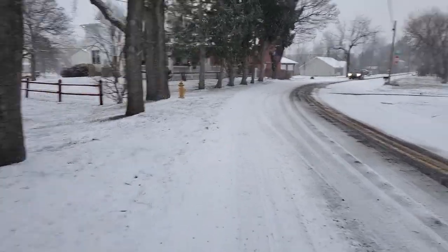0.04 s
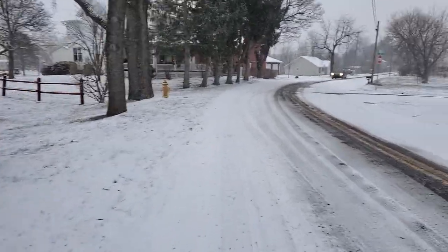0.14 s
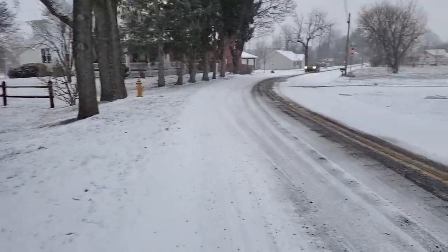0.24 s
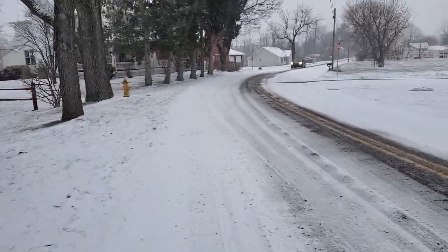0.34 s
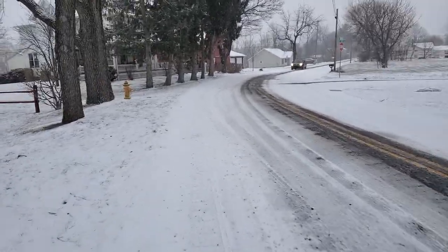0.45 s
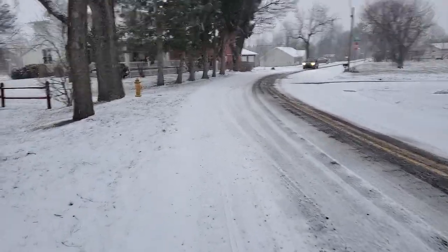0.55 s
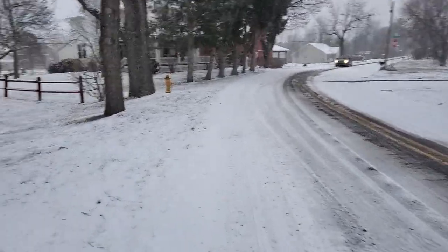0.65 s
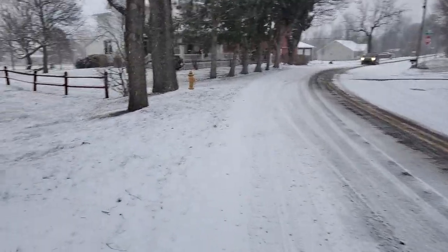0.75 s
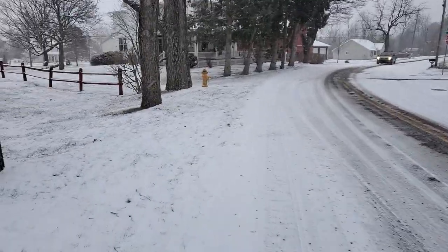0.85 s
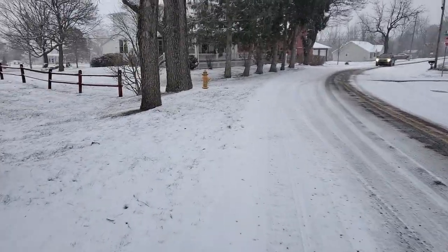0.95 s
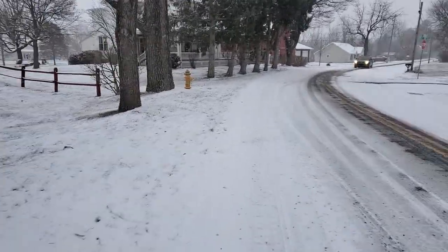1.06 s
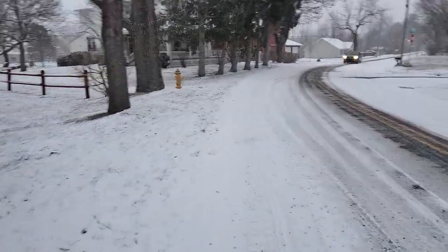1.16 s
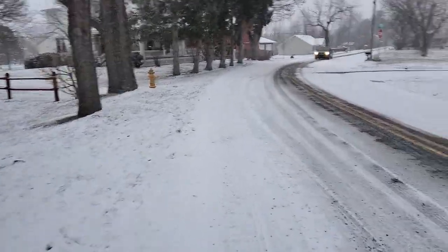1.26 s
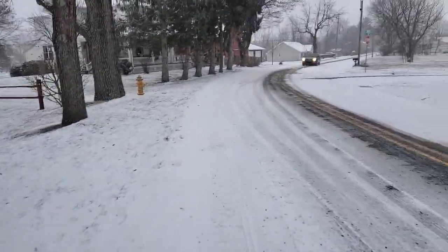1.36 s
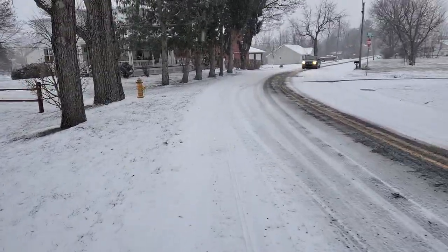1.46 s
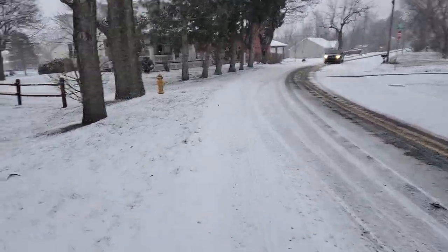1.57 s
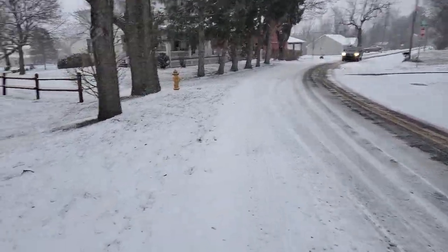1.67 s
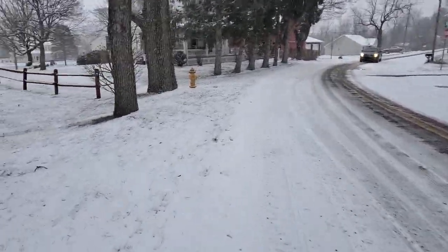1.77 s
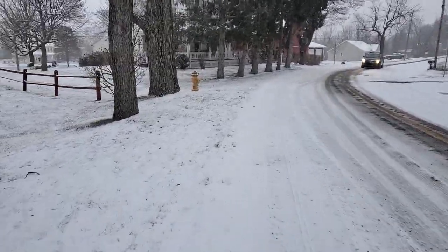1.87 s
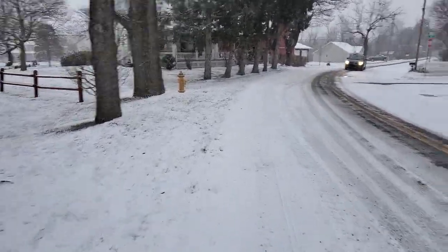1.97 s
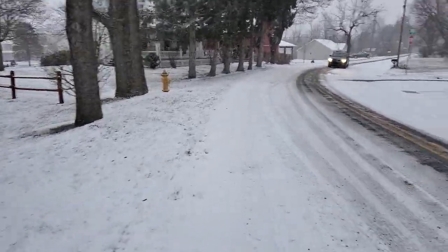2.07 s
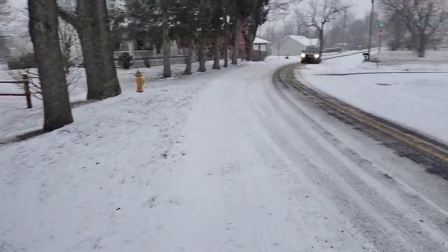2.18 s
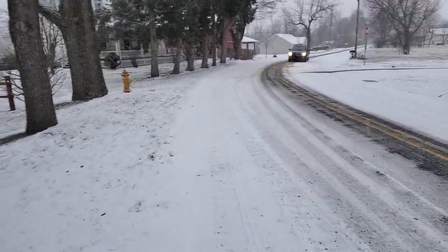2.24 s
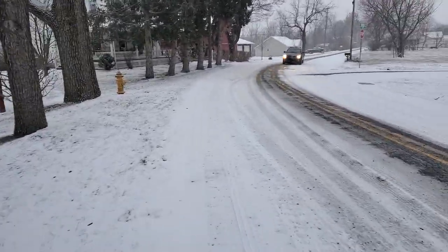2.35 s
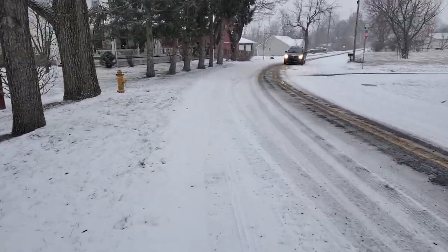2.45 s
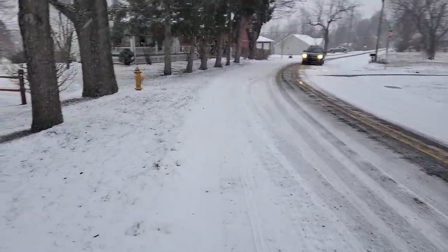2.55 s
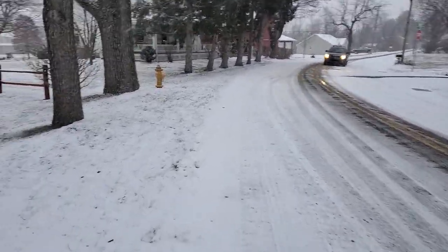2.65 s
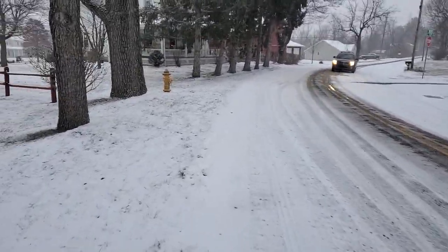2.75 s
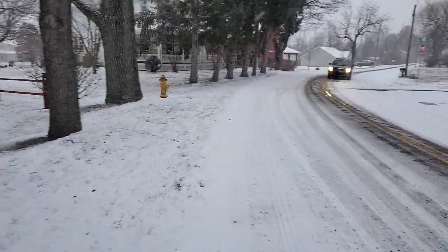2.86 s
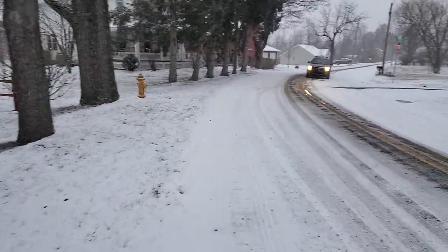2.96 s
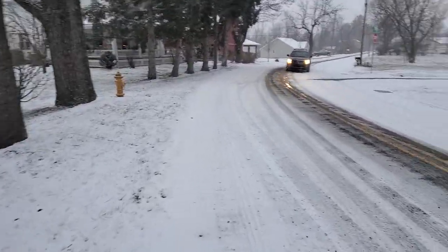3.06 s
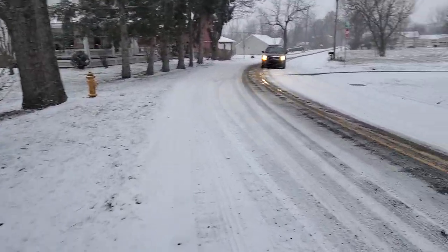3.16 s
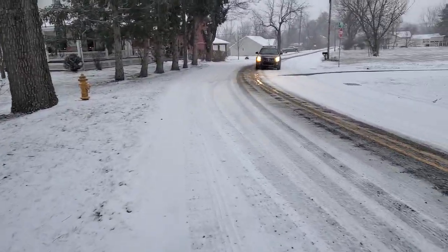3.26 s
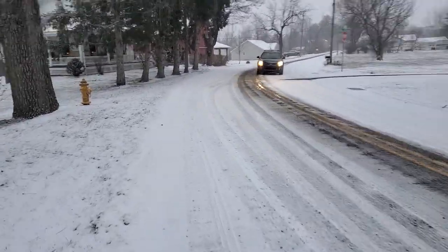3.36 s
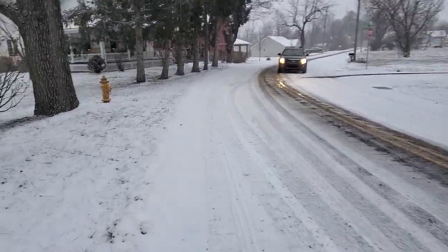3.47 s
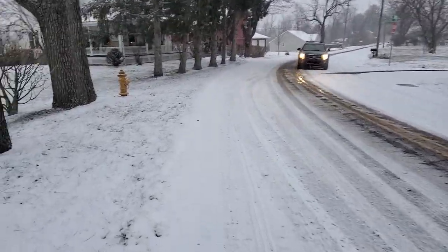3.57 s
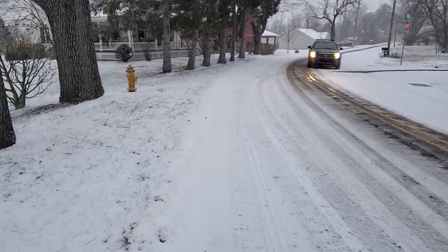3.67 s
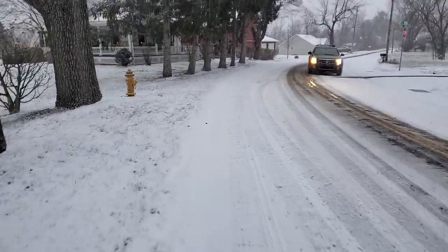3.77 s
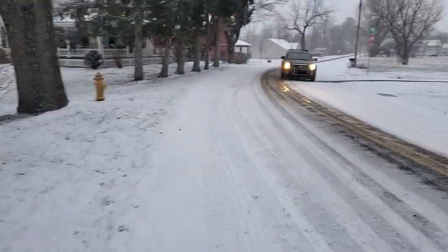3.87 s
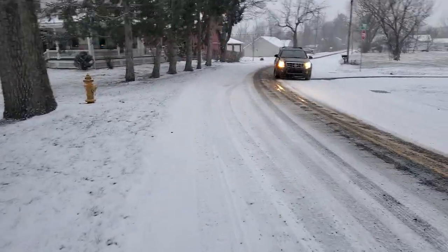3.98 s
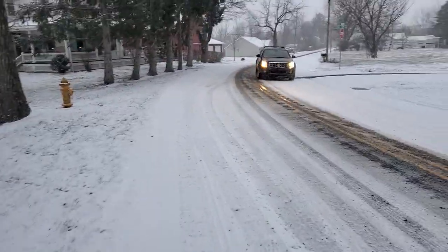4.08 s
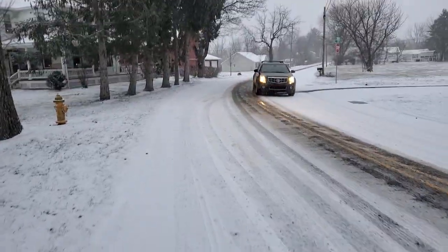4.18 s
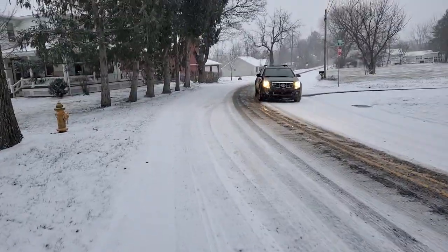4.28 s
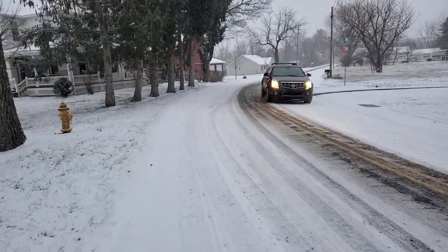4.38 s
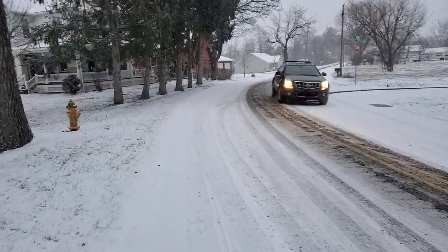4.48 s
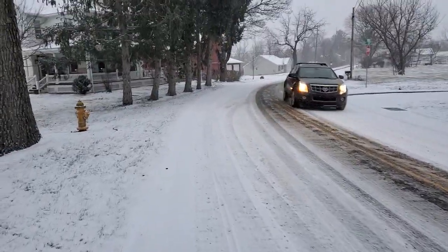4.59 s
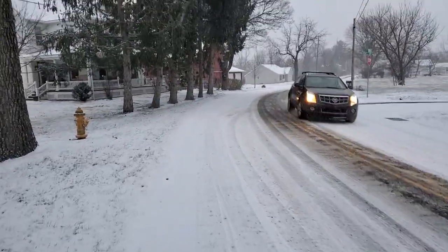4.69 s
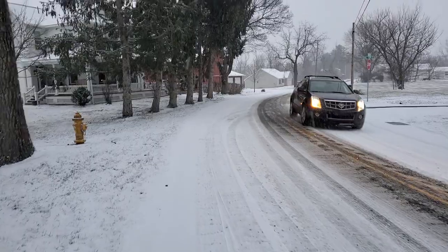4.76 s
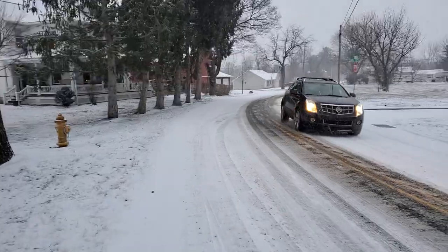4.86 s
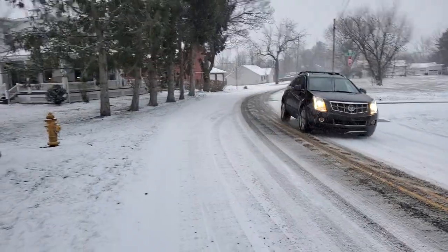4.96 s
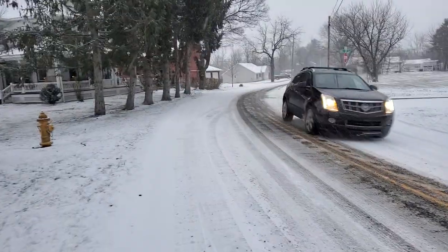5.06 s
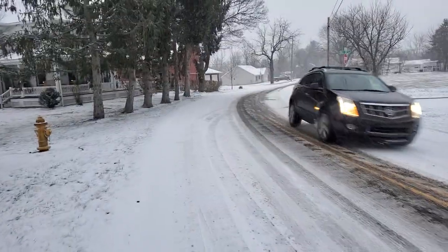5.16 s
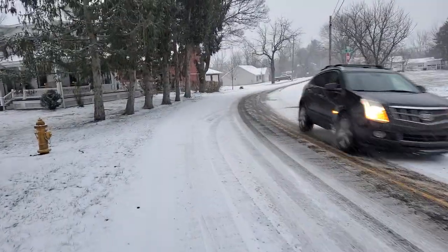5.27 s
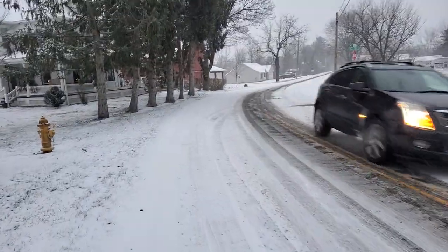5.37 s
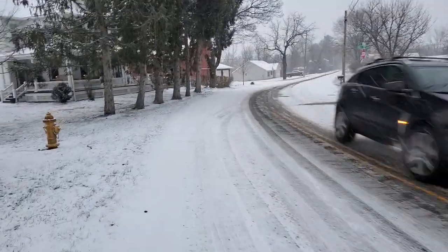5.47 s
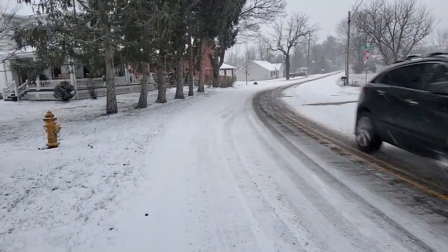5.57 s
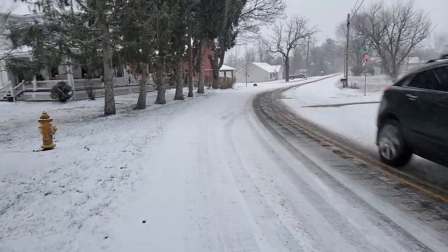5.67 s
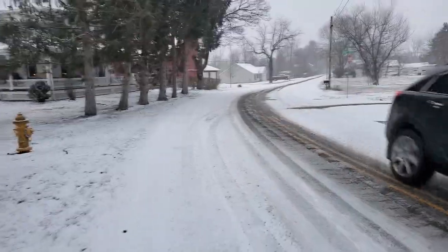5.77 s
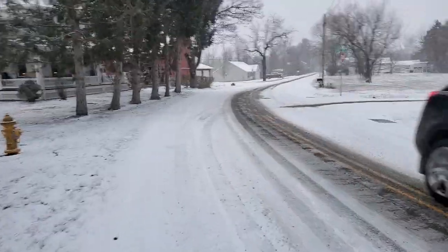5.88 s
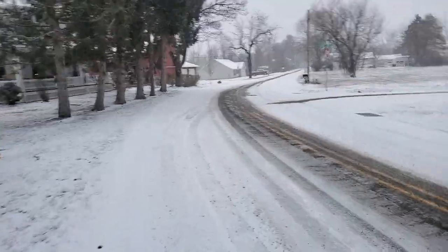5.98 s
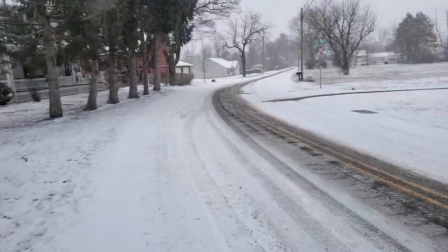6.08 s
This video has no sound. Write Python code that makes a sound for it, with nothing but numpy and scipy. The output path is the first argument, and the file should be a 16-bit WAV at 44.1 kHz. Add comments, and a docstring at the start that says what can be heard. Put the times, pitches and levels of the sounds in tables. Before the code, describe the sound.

A car nears along a slushy road, its wet tyre hiss swelling to a crackling, splashing rush close by, after wind thumps the microphone.

```python
"""Wind, sleet and the recorder's own high hiss open over far traffic, with a car on a slushy road 60 m off.
Gusts thump at the ports of a hand-held recorder, mostly the left: a vortex lump inside filtered noise.
A soft splat and a ringing pellet follow; the car comes round a bend and nears as grains and noise
shaped into roar, crunch, splash, spray and mist, with wet pops as short decaying sines.
Near the end it passes close by on the right, its top opened up and its flank no longer screening the spray."""
import sys
import numpy as np
from scipy import signal
from scipy.fft import rfft, irfft, next_fast_len
from scipy.io import wavfile
from scipy.ndimage import map_coordinates

SR = 44100
rng = np.random.default_rng(int(sys.argv[2]) if len(sys.argv) > 2 else 0)


def file_out(sig):
    """Save sig as 16-bit WAV at sys.argv[1]."""
    # one column per channel
    cols = np.atleast_2d(sig).T
    # limit, then scale
    lim = np.clip(cols, -1, 1)
    pcm = np.round(lim * 32767).astype(np.int16)
    wavfile.write(sys.argv[1], SR, pcm)


N = 270333

# Levels in the tables are relative: the sources and the recorder's case set the final ones.
# wind on the ports between gusts: start_s, left_db, right_db
BREEZE_LEVELS = [(0, -31, -39.5), (0.4, -39.5, -36.5), (0.68, -36, -39.5), (1, -30, -35.5),
                 (1.3, -29.5, -27), (1.7, -29.5, -39), (2.5, -38, -42.5), (3.15, -31.5, -38),
                 (3.9, -34, -41.5), (4.5, -41, -39), (5.1, -35, -41)]
# short thumps of wind: centre_s, level_db, duration_s, upper_corner_hz, port (0 left, 1 right)
GUST_EVENTS = [(0.574, -20.5, 0.019, 195, 1), (0.613, -14.5, 0.021, 191, 1), (0.726, -25.5, 0.016, 181, 0),
               (0.852, -15, 0.0099, 190, 0), (0.873, -13, 0.018, 373, 0), (0.89, -18, 0.0095, 400, 0),
               (1.033, -19, 0.015, 382, 0), (1.053, -13.5, 0.016, 476, 0), (1.07, -25, 0.0044, 332, 0),
               (1.122, -26.5, 0.0069, 520, 0), (1.154, -22, 0.02, 350, 1), (1.192, -13.5, 0.029, 390, 0),
               (1.22, -23, 0.023, 197, 0), (1.273, -24, 0.038, 575, 0), (1.314, -17, 0.025, 496, 0),
               (1.371, -11.5, 0.02, 805, 0), (1.384, -9.5, 0.012, 170, 0), (1.404, -9.5, 0.016, 650, 0),
               (1.402, -30, 0.02, 240, 1), (1.457, -19.5, 0.023, 740, 0), (1.498, -18, 0.0071, 298, 1),
               (1.498, -15.5, 0.0046, 260, 0), (1.568, -26, 0.019, 556, 0), (1.61, -18.5, 0.0081, 282, 0),
               (1.695, -19, 0.017, 298, 0), (1.811, -29.5, 0.022, 342, 0), (2.081, -19, 0.022, 330, 0),
               (2.195, -25, 0.024, 320, 0), (3.031, -19.5, 0.0099, 230, 0), (3.085, -19.5, 0.021, 240, 0),
               (3.248, -25.5, 0.054, 292, 0), (3.82, -25.5, 0.032, 430, 0), (4.052, -27, 0.066, 358, 0),
               (4.742, -16, 0.026, 162, 1), (5.076, -17.5, 0.02, 292, 1), (5.176, -11, 0.016, 250, 1)]
# spectrum of the breeze: frequency_hz, density_db (per Hz)
WIND_SPECTRUM = [(15, -26), (30, -1.5), (70, 3.5), (100, -7), (170, -16.5), (280, -31), (500, -32.5),
                 (1200, -62.5)]
# single ice grains on the case: start_s, peak_db, left_minus_right_db
SLEET_TICKS = [(0.119, -44, -6), (0.245, -45, 7), (0.3005, -46, -6), (0.498, -53, -1), (0.5377, -49, 8),
               (0.629, -50, -4), (0.6744, -50, -2), (0.678, -49, -2), (0.7402, -46, -10), (0.766, -47, -8),
               (0.966, -43, -10), (1.0266, -44, -10), (1.1053, -42, -5), (1.2216, -43, -5), (1.25, -45, 0),
               (1.267, -43.5, 6), (1.293, -47, -6), (1.319, -40, -9), (1.366, -41, -10), (1.381, -44, -2),
               (1.431, -40, -8), (1.444, -45, -5), (1.457, -47, -8), (1.466, -44, -11), (1.634, -54, -2),
               (1.704, -47, -3), (1.723, -45, -5), (1.7441, -33, -3), (1.7853, -43, -6), (1.8477, -48, -7),
               (1.954, -41, -1), (2.568, -33, -9), (2.591, -35, -1), (2.63, -37, -4), (3.262, -28, -4),
               (3.4096, -33, 1)]
# brightness of ticks and patter: frequency_hz, gain_db
TICK_COLOUR = [(1000, -11), (3000, 3.5), (5000, 1.5), (7300, -3), (9000, -9), (12000, 0), (15000, 2.5)]
# the recorder's own hiss: frequency_hz, density_db (per Hz)
HISS_SPECTRUM = [(8500, -20), (12000, -3), (15000, 6)]
# wash of far traffic: frequency_hz, density_db (per Hz)
TRAFFIC_SPECTRUM = [(100, 3), (260, 6.5), (400, -7), (560, -1.5), (680, -7), (850, -13), (1300, -26),
                    (2150, -15), (4000, -35), (7000, -33.5), (9000, -51), (16000, -54)]

# the car's steady run past the verge
SPEED_M_PER_S, PASS_S, NEAREST_M = 10.56, 5.854, 5.03
FLANK_S, FLANK_TURN_S = 5.11, 0.23   # its flank comes into view and no longer screens the spray
ABREAST_S, ABREAST_TURN_S = 5.32, 0.21   # the case's colour for sound from ahead gives way
# bearing of the car: time_s, right_port_lead_ms, directness (0-1)
CAR_BEARING = [(1.6, 0.14, 0.72), (3.2, 0.044, 0.84), (4.1, 0.047, 0.96), (5.2, 0.1, 0.98),
               (5.85, 0.32, 0.14), (6.13, 0.43, 0.9)]
# likeness of the grains at both ports: frequency_hz, shared_power (0-1)
PORT_LIKENESS = [(100, 0.68), (700, 0.99), (1500, 0.85), (2400, 0.54), (5000, 0.86), (8000, 0.047),
                 (16000, 0.11)]
# spectra of the car's layers, low to high: frequency_hz, density_db (per Hz)
RUMBLE_SPECTRUM = [(30, -41), (70, 7.5), (140, -4), (250, 0), (340, -5.5), (450, -10.5), (650, -65)]
ROAR_SPECTRUM = [(300, -13), (450, -9.5), (560, -2.5), (750, 2.5), (950, 0), (1150, -7), (1600, -62)]
CRUNCH_SPECTRUM = [(650, -24), (950, -5.5), (1150, -1.5), (1450, -4.5), (1850, -0.5), (2100, -7.5),
                   (2400, -20), (3200, -58)]
SPLASH_SPECTRUM = [(1600, -27), (2200, -2), (2400, 1), (2750, 1.5), (3200, -2.5), (3700, -9), (4600, -37)]
SPRAY_SPECTRUM = [(2800, -10), (3700, 8), (4300, 7), (5400, 2), (6500, 2.5), (7400, 4), (8100, -5),
                  (10000, -50)]
MIST_SPECTRUM = [(6500, -3.5), (8400, -0.5), (10000, 1.5), (12000, 3.5), (14500, 8.5), (16000, 0.5)]
# what the tyres give off along the road: time_s, roar_db, crunch_db, splash_db, spray_db, mist_db
ROAD_LEVELS = [(0, -19, -10.5, -18, 12, 7), (0.35, -6, -6, -15.5, -8, 0), (0.7, -8, -9.5, -21.5, -11, -7),
               (1.58, -8.5, -13.5, -19, -22, -16), (1.68, -3, -7, -19, -15, -2),
               (1.84, -3.5, -6, -15.5, -5, -6), (2.03, 0.5, 0.5, -5.5, 3.5, 0), (2.4, -2, 2.5, -1, 7, 3),
               (2.66, 3.5, 3.5, 0.5, 4, -1), (2.78, -2.5, 1, -9, 2.5, 1.5), (3.45, -2, 0.5, -8.5, -4, -2),
               (3.7, -5.5, 2.5, 0.5, 1, 2.5), (4.22, -9, 0.5, -1.5, 0.5, 1), (4.57, -6, -0.5, -2, -4, -3.5),
               (4.92, -7.5, 0.5, 1, 2, 1.5), (5.2, -0.5, 6.5, 4.5, 3, 1), (5.55, -1.7, -0.2, 1, 2.5, 2.4),
               (6.13, -2.5, -0.5, 1, -2.5, -1.5)]
# puddles of slush: peak_s, rise_s, crunch_change_db, spray_change_db, mist_change_db
PUDDLE_SWELLS = [(2.425, 0.013, -1, 5, 8), (2.6, 0.044, 0.6, 2.5, 0.5), (2.95, 0.037, -0.5, 1, 8.5),
                 (3.2, 0.09, 1.5, 4, 8), (3.74, 0.34, 0.5, 0, 3), (4.015, 0.048, 5, 1.3, 6),
                 (4.335, 0.054, 3.5, 1, 7.5), (4.68, 0.071, 3, 2, 9.5), (4.99, 0.058, 1, 0, 9.5),
                 (5.71, 0.083, 1.64, -1.6, -1.5), (6.041, 0.01, 2.9, 0.5, 0.5)]
# wedge of air between tyre and road: time_s, resonance_hz, ringing_mix (0-1)
WEDGE_RESONANCE = [(0.3, 1250, 0.16), (1.3, 1280, 0.07), (1.75, 1120, 0.8), (2.4, 1185, 0.82),
                   (3.3, 1280, 0.7), (4.0, 1320, 0.18), (4.7, 1490, 0.63), (5.4, 1440, 0.43),
                   (5.85, 1400, 0.05), (6.13, 1490, 0.37)]
# wandering lift in the spray: time_s, centre_hz, lift (linear gain of the added band)
SIZZLE_BAND = [(1.8, 3400, 0.1), (2.1, 3900, 0.15), (2.45, 4900, 0.4), (2.85, 4760, 0.4), (3.3, 5270, 0.05),
               (3.85, 4930, 0.58), (4.3, 5770, 0.97), (4.6, 5600, 0.02), (5.15, 6500, 0.02),
               (5.45, 6300, 0.2), (6.0, 4930, 0.55)]
# echo off the road: time_s, first_notch_hz, echo_strength (0-1)
ROAD_ECHO = [(1.5, 1767, 0), (2.0, 2330, 0.55), (2.5, 2300, 0.62), (2.85, 3070, 0.43), (3.45, 3770, 0.47),
             (3.6, 2350, 0), (4.4, 2460, 0.49), (6.13, 3100, 0.02)]
# short wet bursts, mostly clumps bursting under the tread; the first row, at 0.821 s, is the ringing part of a
# knock of the hand on the case: start_s, peak_db, pitch_hz
SLUSH_POPS = [(0.821, -24, 1270), (1.265, -23.5, 1150), (1.791, -23, 1110), (2.009, -18.5, 840),
              (2.206, -17.5, 1230), (2.577, -17.5, 1110), (2.585, -17, 1150), (2.944, -17.5, 1090),
              (3.141, -21, 1300), (3.227, -15, 1210), (3.353, -17, 1310), (3.732, -31, 1220),
              (3.847, -14, 1420), (3.966, -26, 1400), (4.036, -16, 1210), (4.073, -19.5, 1220),
              (4.178, -17.5, 1350), (4.309, -14, 1500), (4.354, -8, 1540), (4.402, -14, 1610),
              (4.596, -19, 1470), (4.687, -8, 1420), (4.945, -6.5, 1440), (5.012, -7.5, 1460),
              (5.037, -11, 1610), (5.103, -1.5, 1290), (5.163, -15, 1340), (5.227, -6.5, 1030),
              (5.286, -6, 1010), (5.576, -4.5, 860), (5.686, -5, 910), (5.738, -4.5, 815), (6.039, 1, 1630),
              (6.087, -3.5, 1800)]
# soft bumps of the hand on the case: start_s, left_db, right_db
HAND_BUMPS = [(0.821, -28, -28), (2.25, -30.5, -30), (2.863, -21.5, -46)]
# ringing of the case under a pellet: pitch_hz, level_db, t60_s
PELLET_MODES = [(2750, 1, 0.0043), (3760, 0.5, 0.0045), (4670, -9, 0.004), (6560, -9, 0.003)]
# tilt between the ports from the case: frequency_hz, left_minus_right_db
CASE_TILT = [(100, 0), (350, 0.2), (700, -2), (1200, 0), (1800, -2), (2400, -6), (3100, 0), (3900, 8.8),
             (5000, 2.7), (6200, 3), (7400, 6), (8300, 1), (9400, 4.3), (14000, 2.6)]
# further colour of the case while the car is ahead: frequency_hz, left_db, right_db
AHEAD_COLOUR = [(2400, -0.5, 0), (3150, 0.5, 1), (3500, -0.5, -3.5), (4380, 2.5, 6.5), (5060, 1.5, 4),
                (6540, 0.5, 1.5), (7460, 3, -4), (8340, -0.5, -9), (9200, 0.5, 1), (11000, 0, -11),
                (13000, -6, -0.5), (15800, 3.5, -9)]
# moving dips at the right port: time_s, low_hz, low_depth, middle_hz, middle_depth, high_hz, high_depth
# (depths 0-1)
CASE_DIPS = [(3.6, 3900, 0.9, 7700, 0.05, 9700, 0.05), (4.1, 3800, 1, 7500, 0.85, 9700, 0.6),
             (4.45, 3900, 1, 7400, 0.6, 9650, 0.5), (4.95, 3950, 0.9, 7050, 0.2, 9450, 0.6),
             (5.35, 4000, 0.7, 6900, 0, 8900, 0.8), (5.7, 4270, 0, 6900, 0.2, 8700, 0),
             (5.95, 4430, 0, 7000, 0.05, 8700, 0.05)]


def from_db(db):
    """Decibels to gain."""
    return 10 ** (np.asarray(db) / 20)


def rms_one(x):
    """Scale to unit rms."""
    return x / np.sqrt(np.mean(x ** 2) + 1e-20)


def in_time(rows):
    """One curve per column, a value for every sample."""
    s, *columns = np.transpose(rows)
    return [np.interp(np.arange(N) / SR, s, column) for column in columns]


def until(s, turn_s):
    """A smooth step from 1 down to 0, halfway at s."""
    return .5 - .5 * np.tanh((np.arange(N) / SR - s) / turn_s)


def bin_hz():
    """Frequency of every FFT bin."""
    return np.fft.rfftfreq(next_fast_len(N), 1 / SR)


def per_bin(points):
    """A table over log frequency, read at every FFT bin."""
    hz, value = np.transpose(points)
    return np.interp(np.log(bin_hz() + 1), np.log(hz), value)


def filtered(x, gain):
    """Apply a gain per FFT bin."""
    size = next_fast_len(N)
    return irfft(rfft(x, size) * gain, size)[..., :N]


def coloured(x, spectrum):
    """Shape x by a spectrum; rms 1."""
    return rms_one(filtered(x, from_db(per_bin(spectrum))))


def drift(rate_hz):
    """Slow random wander, low-passed at rate_hz, with spread 1."""
    size = N // 50
    hz = np.fft.rfftfreq(size, N / size / SR)
    slow = irfft(rfft(rng.standard_normal(size)) / (1 + (hz / rate_hz) ** 2), size)
    return np.interp(np.linspace(0, size - 1, N), np.arange(size), rms_one(slow))


def resonance(x, centre_hz, width_hz):
    """A two-pole resonance whose centre moves in short blocks; gain about 1 on top."""
    r = np.exp(-np.pi * width_hz / SR)
    out, state, size = np.zeros_like(x), np.zeros((2, 2)), 2 ** 10
    for i in range(0, N, size):
        poles = [1, -2 * r * np.cos(2 * np.pi * centre_hz[i] / SR), r * r]
        out[:, i:i + size], state = signal.lfilter([1, 0, -1], poles, x[:, i:i + size], zi=state)
    return out * (1 - r * r) / 2


def at_ports(x, lead_ms):
    """Sound from the right reaches the left port later."""
    left = map_coordinates(x, [np.arange(N) - lead_ms * SR / 1000], order=3)
    return np.array([left, x])


def grains(per_s, spread_db):
    """Random one-sample bursts of either sign, most of them weak when spread_db is above 0; rms 1."""
    out, born = np.zeros(N), rng.random(N) < per_s / SR
    chance = rng.uniform(-1, 1, N)[born]
    strength_db = spread_db * np.minimum(-np.log(np.abs(chance)), 4)
    out[born] = np.sign(chance) * from_db(strength_db)
    return rms_one(out)


def wind(gust_db, breeze_db, lumpy_db, knee_hz, ragged_db):
    """Each port has eddies of its own; stronger ones break away as short thumps, a vortex in ragged whirls."""
    lumps = from_db(lumpy_db * np.array([drift(30), drift(60)]))
    breeze = coloured(rng.standard_normal((2, N)) * lumps, WIND_SPECTRUM)
    out = from_db(np.array(in_time(BREEZE_LEVELS)) + breeze_db) * breeze
    t = np.arange(-SR // 10, SR // 10) / SR
    above_rumble = signal.butter(2, 44, "high", fs=SR, output="sos")
    for s, level_db, duration_s, corner_hz, port in GUST_EVENTS:
        # small whirls are weaker
        whirls = signal.lfilter([1], [1, -np.exp(-2 * np.pi * knee_hz / SR)], rng.standard_normal(len(t)))
        below_corner = signal.butter(2, corner_hz, fs=SR, output="sos")   # the smallest die out
        whirls = signal.sosfilt(np.vstack([above_rumble] + 3 * [below_corner]), whirls)
        whirls = whirls / (1 + (t / duration_s) ** 2) ** 2
        whirls = whirls / np.sqrt(np.sum(whirls ** 2) / (duration_s * SR))
        # one smooth lump of pressure between two troughs, 1.13 corner cycles as its width
        core = (t * corner_hz / 1.13) ** 2
        vortex = 2 * from_db(-3) * (1 - 2 * core) * np.exp(-core)
        gust = from_db(ragged_db) * whirls + vortex
        out[int(port > .5), int((s + t[0]) * SR):][:len(t)] += from_db(level_db + gust_db) * gust
    return out


def sleet(level_db, patter_db, per_s, decay_s):
    """Ice grains tick on the case near one port or the other, over a fine patter that comes in flurries."""
    out, t = np.zeros((2, N)), np.arange(SR // 200) / SR
    for s, peak_db, pan_db in SLEET_TICKS:
        tick = rng.standard_normal((2, len(t))) * np.exp(-t / decay_s)
        tick = signal.lfilter([1, rng.uniform(-0.92, 0.37)], [1], tick)   # each grain has its own brightness
        tick = tick / np.abs(tick).max(axis=1, keepdims=True)
        ports_db = peak_db + level_db + np.array([[pan_db], [-pan_db]]) / 2
        out[:, int(s * SR):][:, :len(t)] += tick * from_db(ports_db)
    hits = np.abs([grains(per_s, 3.5), grains(per_s, 3.5)])
    envelope = signal.lfilter([1], [1, -np.exp(-1 / (decay_s * SR))], hits + 1e-18)
    flurries = from_db(2 * drift(7.4))
    patter = rms_one(envelope * rng.standard_normal((2, N)) * flurries) * from_db([[-3], [1]])
    return filtered(out + from_db(patter_db) * patter, from_db(per_bin(TICK_COLOUR)))


def recorder_hiss(level_db):
    """The recorder's own faint, steady, very high hiss, separate at each port."""
    return from_db(level_db) * coloured(rng.standard_normal((2, N)), HISS_SPECTRUM)


def far_traffic(level_db):
    """A dull, even wash from other roads, mostly alike at both ports."""
    wash = rng.standard_normal(N) + 0.04 * rng.standard_normal((2, N))
    return from_db(level_db) * coloured(wash, TRAFFIC_SPECTRUM)


def distance_m():
    """How far the car is, sample by sample."""
    return np.hypot(NEAREST_M, SPEED_M_PER_S * (np.arange(N) / SR - PASS_S))


def carried(level_db, loss_db_per_m, screened_db):
    """Gain to the verge: spreading, a loss per metre, and screening by the car's body while head-on."""
    r = distance_m()
    head_on = until(FLANK_S, FLANK_TURN_S)
    return NEAREST_M / r * from_db(level_db - loss_db_per_m * (r - NEAREST_M) - screened_db * head_on)


def underbody():
    """Low rumble of wheels and body, strong only when the car is near."""
    lead_ms, _ = in_time(CAR_BEARING)
    rumble = coloured(at_ports(rng.standard_normal(N), lead_ms), RUMBLE_SPECTRUM)
    return carried(level_db=-31.5, loss_db_per_m=0.77, screened_db=2.5) * rumble


def slush(spectrum, per_s, spread_db, flutter_db, flutter_hz, scatter):
    """Grains straight from the tyres, plus a smoother wash that differs at the two ports; rms 1."""
    lead_ms, direct = in_time(CAR_BEARING)
    alike = np.clip(per_bin(PORT_LIKENESS), 0, 1)
    loose = np.clip((1 - direct) * scatter, 0, 1)
    shared = filtered(at_ports(grains(per_s, spread_db), lead_ms), np.sqrt(alike))
    own = filtered(np.array([grains(per_s, spread_db) for port in range(2)]), np.sqrt(1 - alike))
    both = np.sqrt(1 - loose) * (shared + own) + np.sqrt(loose) * rng.standard_normal((2, N))
    # the slush lies unevenly; 57 % of the flutter evens out once all four tyres are heard
    uneven = 1 - 0.57 * (1 - until(FLANK_S, FLANK_TURN_S))
    return coloured(both * from_db(flutter_db * uneven * drift(flutter_hz)), spectrum)


def puddles():
    """Each puddle bends the levels quickly, then lets go more slowly; dB of crunch, spray and later mist."""
    mist_lag_s = 0.011   # the finest droplets fly up after the tyre meets a puddle
    t, out = np.arange(N) / SR - np.array([[0], [0], [mist_lag_s]]), 0
    for s, rise_s, *swells_db in PUDDLE_SWELLS:
        width_s = np.where(t < s, rise_s, 1.92 * rise_s)   # water falls back more slowly than it rises
        out = out + np.array(swells_db)[:, None] * np.exp(-np.minimum(((t - s) / width_s) ** 2, 20))
    return out


def crackle():
    """Small clumps burst one by one, each a short ring of the wedge; rms 1."""
    lead_ms, _ = in_time(CAR_BEARING)
    wedge_hz, _ = in_time(WEDGE_RESONANCE)
    bursts = at_ports(grains(per_s=150, spread_db=0.0), lead_ms)
    return rms_one(resonance(coloured(bursts, CRUNCH_SPECTRUM), wedge_hz, width_hz=430))


def dulled_by_distance(x, corner_hz):
    """The top of a sound is lost until the car is within about 40 m."""
    dull = filtered(x, 1 / np.hypot(1, (bin_hz() / corner_hz) ** 8))
    far = .5 + .5 * np.tanh((distance_m() - 39.7) / 3.2)   # clears over a few metres
    return x + far * (dull - x)


def sizzling(x):
    """Lift one broad band of the spray, which wanders as the car nears."""
    centre_hz, lift = in_time(SIZZLE_BAND)
    return x + lift * resonance(x, centre_hz, width_hz=1500)


def ground_echo(x):
    """A delayed path off the road weakens one frequency and its odd multiples, sweeping a comb in the hiss."""
    notch_hz, strength = in_time(ROAD_ECHO)
    late = np.arange(N) - SR / (2 * notch_hz)   # half a cycle of the first notch
    echo = np.array([map_coordinates(port, [late], order=3) for port in x])
    return (x + strength * echo) / np.sqrt(1 + strength ** 2)


def patchy(x, depth_db, patch_hz, patch_s):
    """Random patches of the spectrum swell and fade, making the sound uneven and wet."""
    size = 2 ** 9
    _, _, frames = signal.stft(x, nperseg=size)
    field = rng.standard_normal(frames.shape[1:])
    for axis, steps in enumerate([patch_hz * size / SR, patch_s * SR / (size / 2)]):
        keep = np.exp(-1 / steps)
        field = signal.filtfilt([1 - keep], [1, -keep], field, axis=axis, padtype="even")
    gain = rms_one(from_db(depth_db * np.clip(rms_one(field), -2, 2)))
    return signal.istft(frames * gain, nperseg=size)[1][:, :N]


def tyres():
    """The tread roars and crushes slush; the wedge between tyre and road rings; ever finer droplets fly off."""
    roar_db, crunch_db, splash_db, spray_db, mist_db = in_time(ROAD_LEVELS)
    swell_db, spray_swell_db, mist_swell_db = puddles()
    wedge_hz, ringing = in_time(WEDGE_RESONANCE)

    roar = slush(ROAR_SPECTRUM, per_s=1700, spread_db=3.0, flutter_db=2.04, flutter_hz=16, scatter=0.51)
    roar = roar * from_db(roar_db + 1.8 * swell_db)
    roar = roar * carried(level_db=-25, loss_db_per_m=0, screened_db=0.5)

    crunch = slush(CRUNCH_SPECTRUM, per_s=2800, spread_db=2.5, flutter_db=1.5, flutter_hz=9, scatter=0.7)
    wedge_ring = resonance(crunch, wedge_hz, width_hz=232)
    crunch = rms_one((1 - ringing) * crunch + 1.5 * ringing * wedge_ring)
    crunch = rms_one(crunch + from_db(-9.5) * crackle())
    crunch = crunch * from_db(crunch_db + swell_db)
    crunch = crunch * carried(level_db=-21.5, loss_db_per_m=0, screened_db=0)

    splash = slush(SPLASH_SPECTRUM, per_s=1200, spread_db=1.0, flutter_db=1.1, flutter_hz=16, scatter=1.0)
    splash = splash * from_db(splash_db + 0.63 * mist_swell_db)
    # a negative loss: the splash falls off less than spreading alone
    splash = splash * carried(level_db=-29.0, loss_db_per_m=-0.13, screened_db=1.2)

    spray = slush(SPRAY_SPECTRUM, per_s=4500, spread_db=5.0, flutter_db=1.05, flutter_hz=46, scatter=1.0)
    spray = spray * from_db(spray_db + spray_swell_db)
    spray = spray * carried(level_db=-32.5, loss_db_per_m=0.3, screened_db=3.5)

    mist = slush(MIST_SPECTRUM, per_s=6500, spread_db=4.0, flutter_db=2.4, flutter_hz=10, scatter=0.092)
    mist = mist * from_db(mist_db + mist_swell_db)
    mist = mist * carried(level_db=-28.5, loss_db_per_m=0.3, screened_db=5.0)

    spurts = from_db(0.99 * drift(77))   # drops of all sizes are thrown together
    hiss = ground_echo(splash + dulled_by_distance(sizzling(spray), corner_hz=5230)) + mist
    hiss = patchy(hiss, depth_db=1.3, patch_hz=606, patch_s=0.06)
    tread = roar + dulled_by_distance(crunch, corner_hz=1860)
    return patchy(tread + spurts * hiss, depth_db=1.78, patch_hz=69, patch_s=0.0089)


def pops(decay_s, level_db, after_db):
    """A bursting clump gives a cycle or two of pressure at its own pitch, then a weaker one as it breaks up."""
    lead_ms, _ = in_time(CAR_BEARING)
    out, t = np.zeros(2 * N), np.arange(SR // 100) / SR
    envelope = t / decay_s * np.exp(1 - t / decay_s)
    for s, peak_db, pitch_hz in SLUSH_POPS:
        burst = envelope * np.sin(2 * np.pi * pitch_hz * t)
        after_s = rng.uniform(0.0012, 0.00416)
        for delay_s, part_db in [(0, level_db), (after_s, level_db + after_db)]:
            out[int((s + delay_s) * SR):][:len(t)] += from_db(peak_db + part_db) * burst
    return at_ports(out[:N], lead_ms)


def bumps(pitch_hz, decay_s):
    """The held case gives a dull, damped note."""
    out, t = np.zeros((2, N)), np.arange(SR // 20) / SR
    note = t / decay_s * np.exp(1 - t / decay_s) * np.sin(2 * np.pi * pitch_hz * t)
    for s, left_db, right_db in HAND_BUMPS:
        out[:, int(s * SR):][:, :len(t)] += from_db([[left_db], [right_db]]) * note
    return out


def far_splat(at_s, rise_s, level_db, centre_hz, width_hz):
    """One lump of slush lands some way off: a short, soft splat of band-limited noise."""
    t = np.maximum(np.arange(N) / SR - at_s, 0) / rise_s
    burst = resonance(rng.standard_normal((2, N)), np.full(N, centre_hz), width_hz)
    return from_db(level_db) * rms_one(burst) * t * np.exp(1 - np.minimum(t, 20))


def pellet(at_s, left_db, right_db):
    """A hard pellet sets the case ringing for a few milliseconds."""
    out, t = np.zeros((2, N)), np.arange(SR // 50) / SR
    ring = sum(from_db(db - 60 * t / t60_s) * np.sin(2 * np.pi * hz * t) for hz, db, t60_s in PELLET_MODES)
    ring = ring / np.abs(ring).max()
    out[:, int(at_s * SR):][:, :len(t)] = np.outer(from_db([left_db, right_db]), ring)
    return out


def case_shading(x):
    """The case colours each port, with further colour for sound from ahead."""
    shade = from_db(per_bin(CASE_TILT) * np.array([[.5], [-.5]]))
    x = filtered(x, shade / np.sqrt(np.mean(shade ** 2, axis=0)))
    hz, *ports_db = np.transpose(AHEAD_COLOUR)
    ahead = filtered(x, from_db([per_bin(list(zip(hz, db))) for db in ports_db]))
    return x + until(ABREAST_S, ABREAST_TURN_S) * (ahead - x)


def swept_dips(x):
    """Paths round the case cancel at the right port, at pitches that move with the car's bearing."""
    curves = in_time(CASE_DIPS)
    for hz, depth, width_hz in zip(curves[::2], curves[1::2], [780, 830, 970]):
        right_only = np.outer([0, 1], np.clip(depth, 0, 1))
        x = x - right_only * resonance(x, hz, width_hz)
    return x


def scene():
    """The car and far traffic, shaded by the recorder's case, with wind, sleet and hiss right at the ports."""
    at_recorder = wind(gust_db=-0.5, breeze_db=1.0, lumpy_db=3.5, knee_hz=31.8, ragged_db=-2.0)
    at_recorder = at_recorder + sleet(level_db=6, patter_db=-62, per_s=110, decay_s=0.00094)
    at_recorder = at_recorder + recorder_hiss(level_db=-70)
    car = underbody() + tyres() + pops(decay_s=0.00049, level_db=-4.0, after_db=-4.0)
    splat = far_splat(at_s=1.637, rise_s=0.0055, level_db=-53, centre_hz=2400, width_hz=330)
    around = far_traffic(level_db=-47.5) + splat
    touches = bumps(pitch_hz=357, decay_s=0.0013) + pellet(at_s=1.7438, left_db=-32, right_db=-28)
    return swept_dips(case_shading(car + around)) + at_recorder + touches


def record(dry):
    """A low cut tames the wind, the highest peaks are rounded and the top is cut steeply."""
    dry = signal.sosfilt(signal.butter(2, 38, "high", fs=SR, output="sos"), dry)
    rounded = dry / (1 + dry ** 4) ** (1 / 4)
    return signal.sosfilt(signal.ellip(12, .1, 80, 15900, fs=SR, output="sos"), rounded)


dry = scene()
out = record(dry)
file_out(out)
```